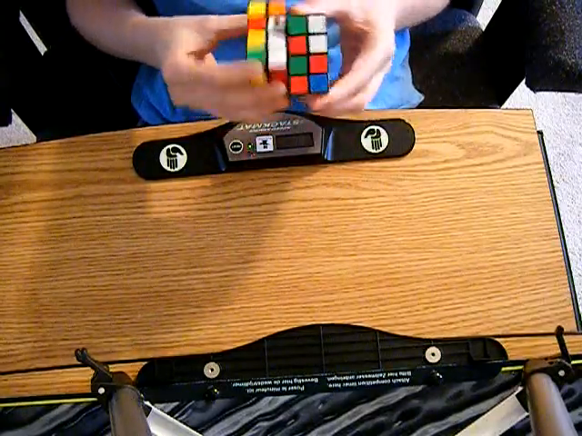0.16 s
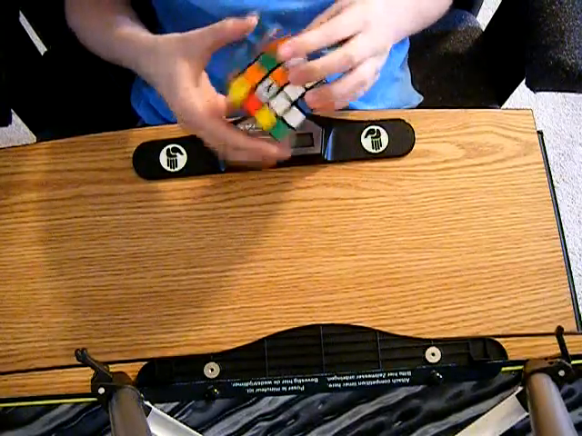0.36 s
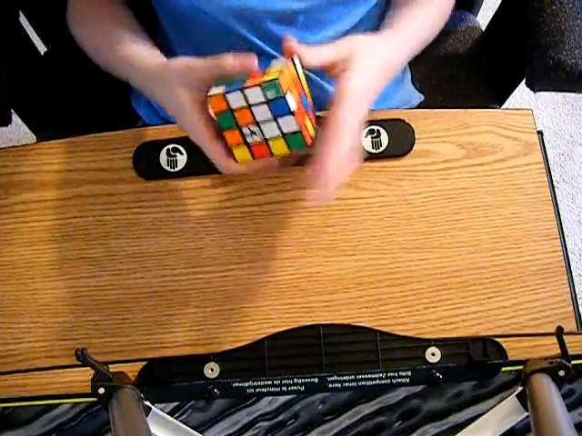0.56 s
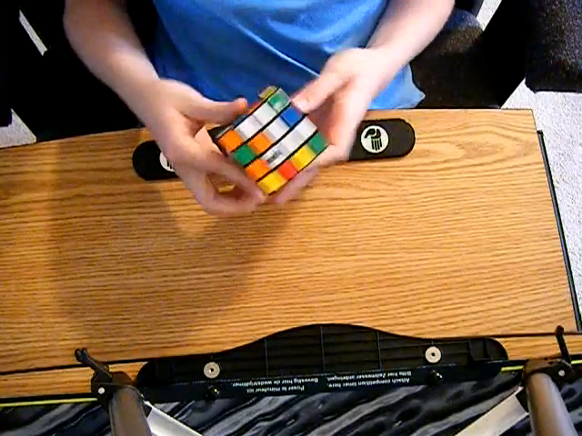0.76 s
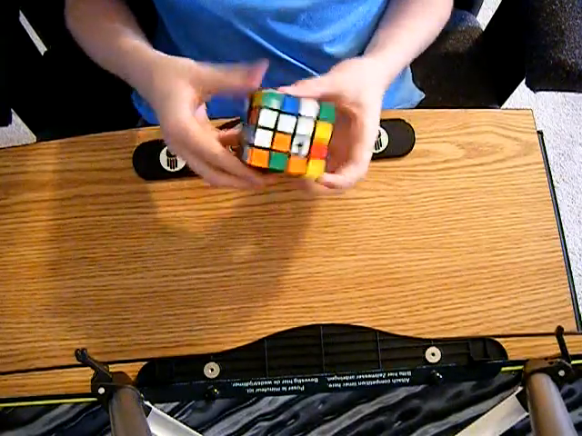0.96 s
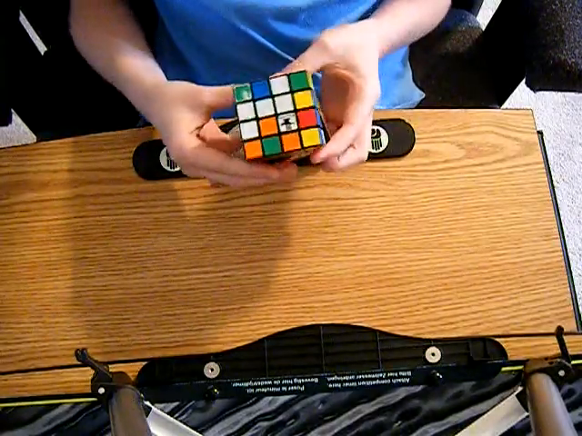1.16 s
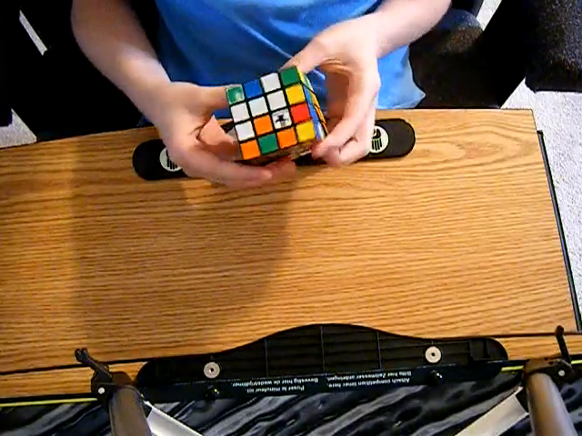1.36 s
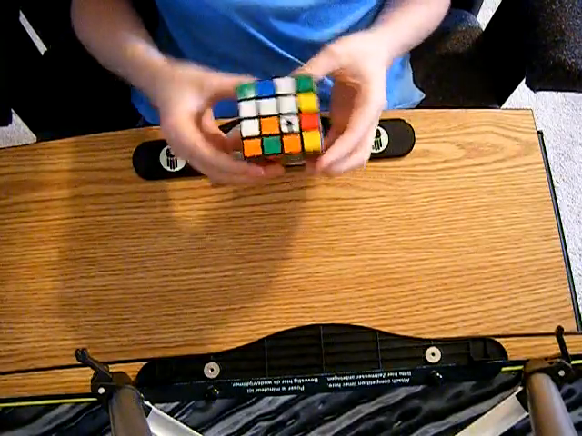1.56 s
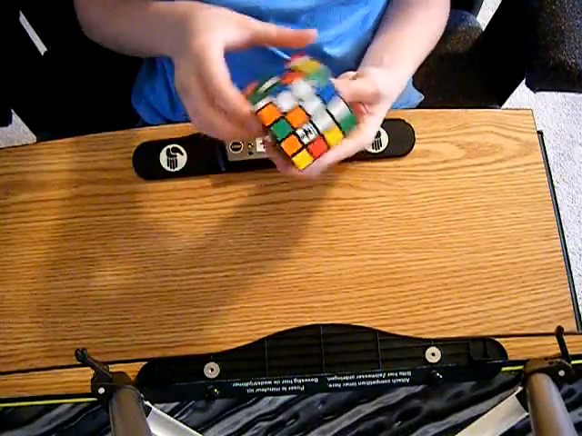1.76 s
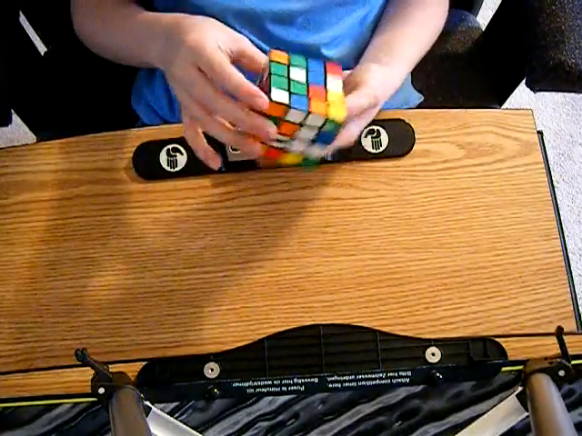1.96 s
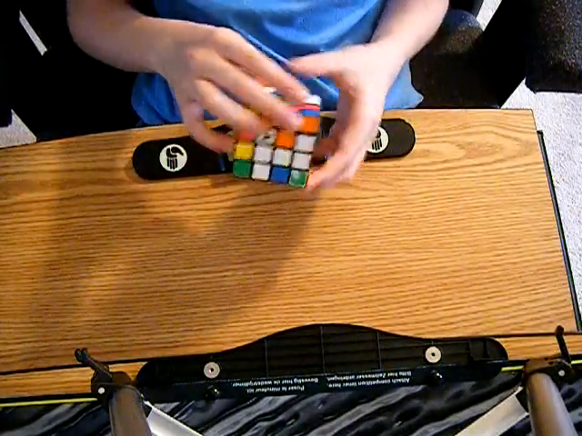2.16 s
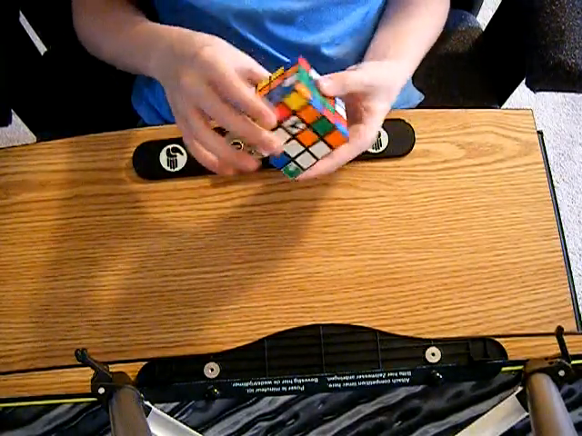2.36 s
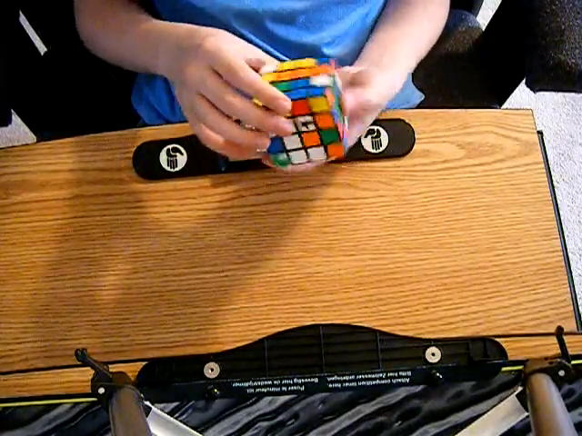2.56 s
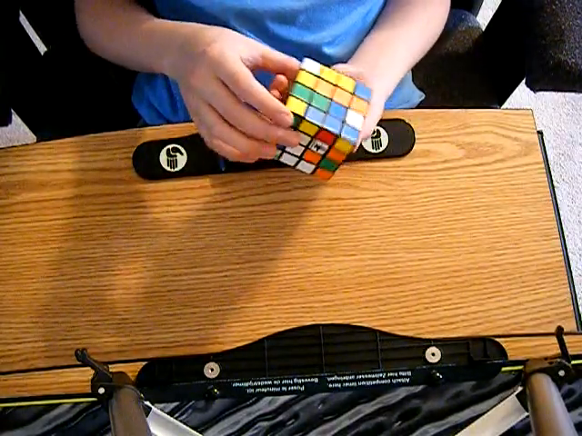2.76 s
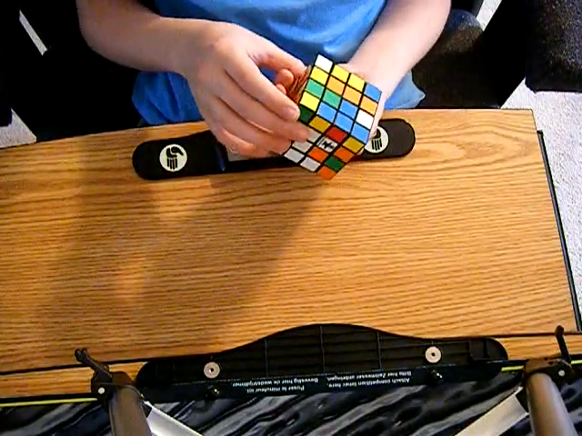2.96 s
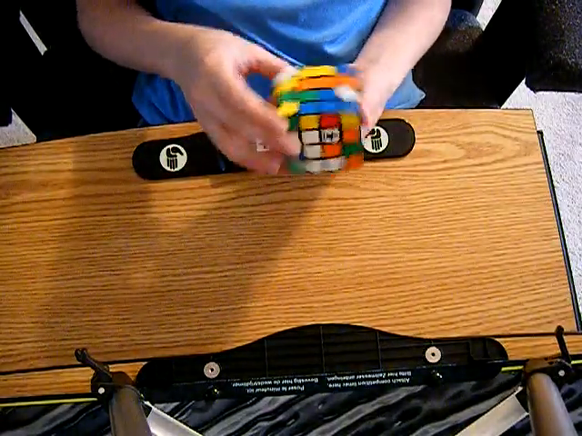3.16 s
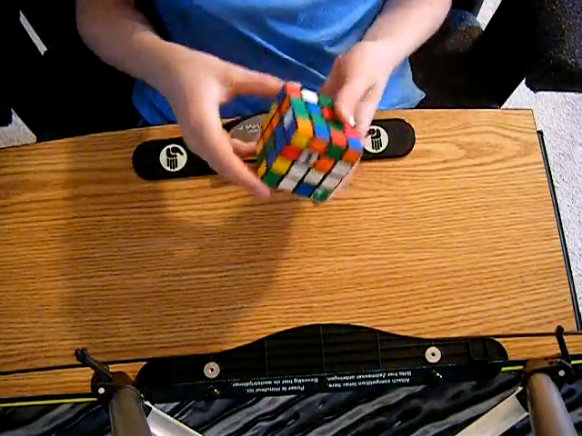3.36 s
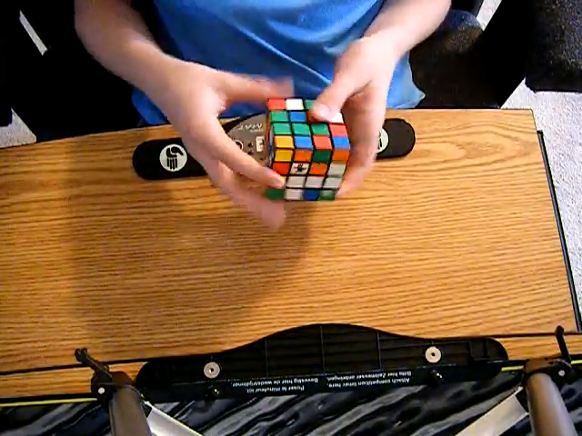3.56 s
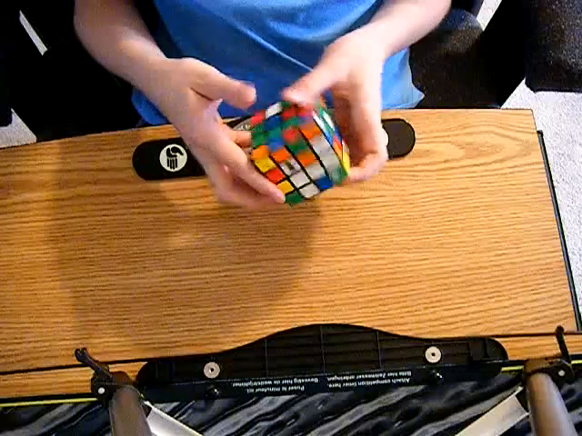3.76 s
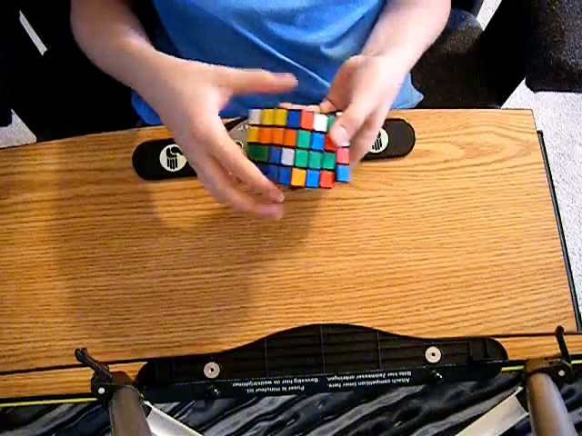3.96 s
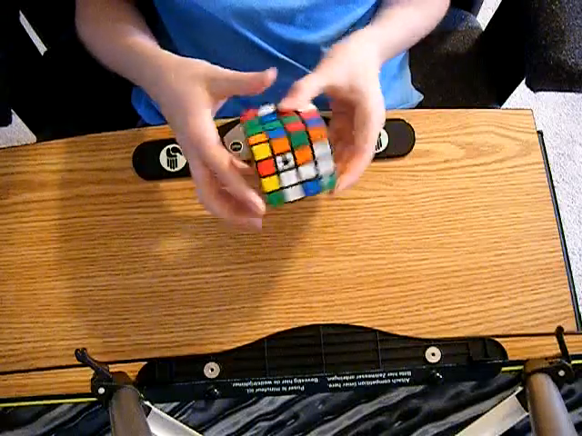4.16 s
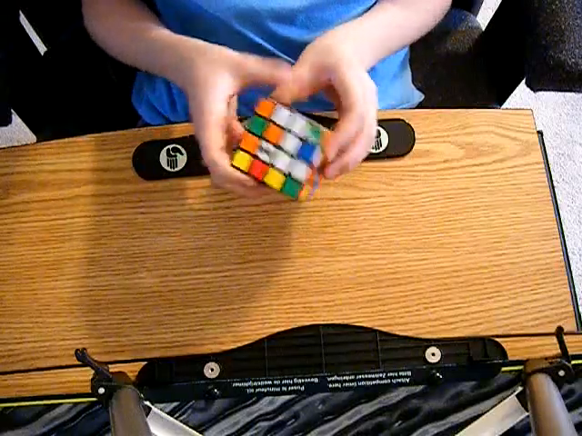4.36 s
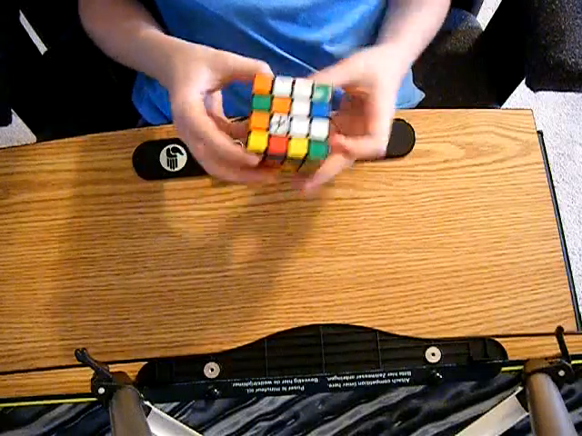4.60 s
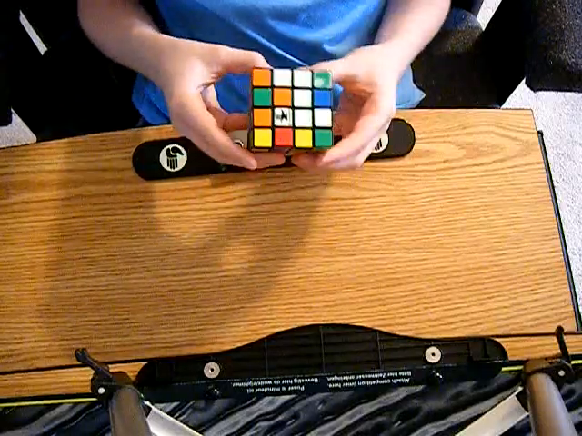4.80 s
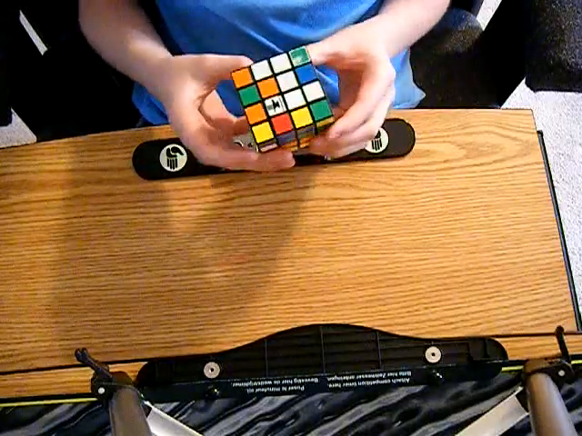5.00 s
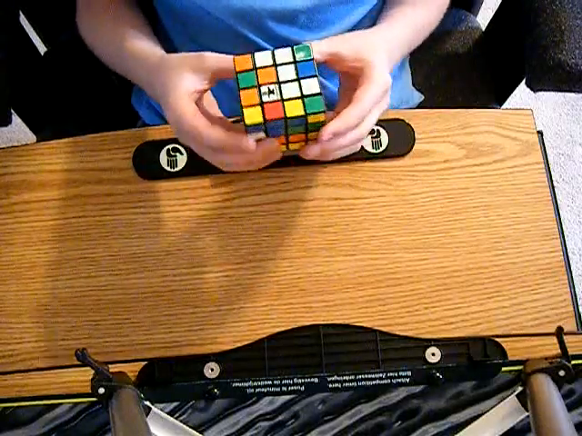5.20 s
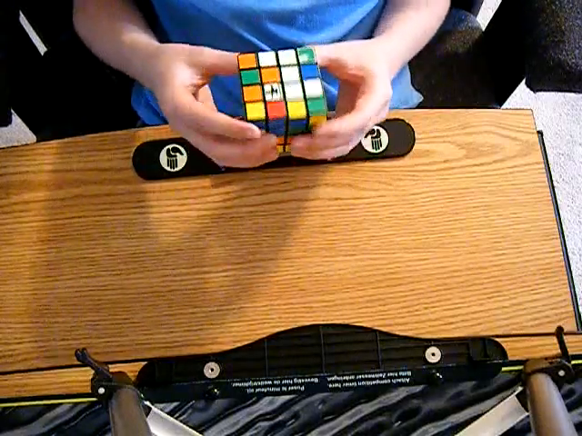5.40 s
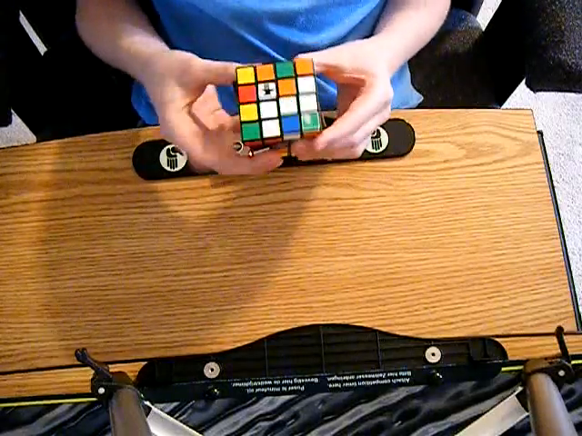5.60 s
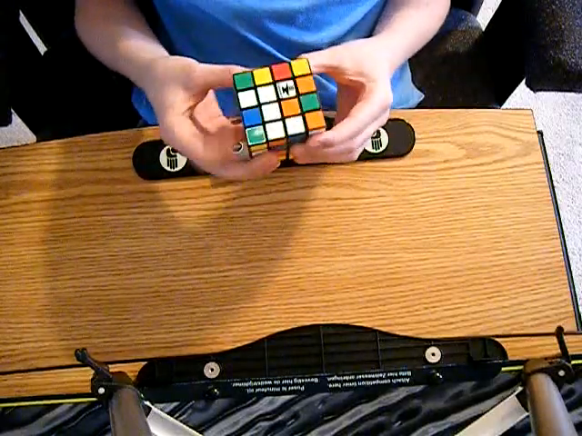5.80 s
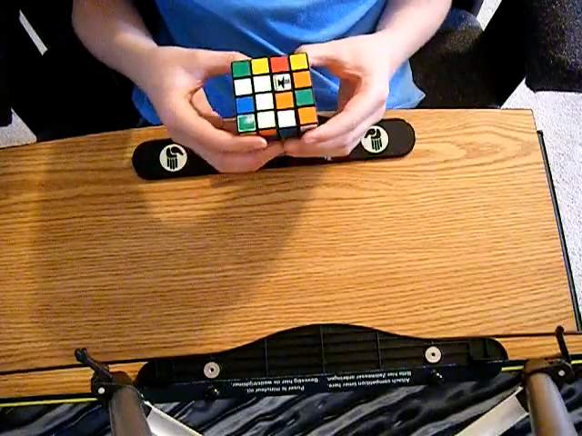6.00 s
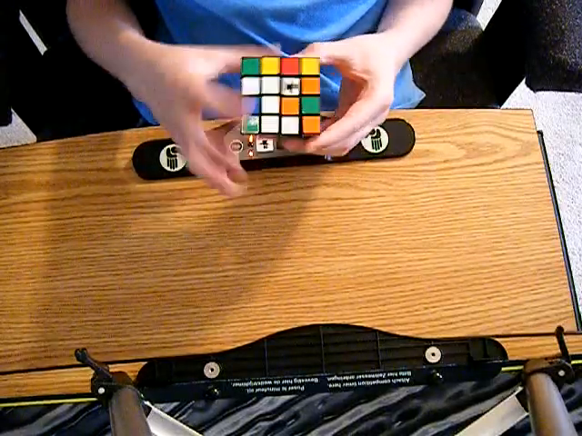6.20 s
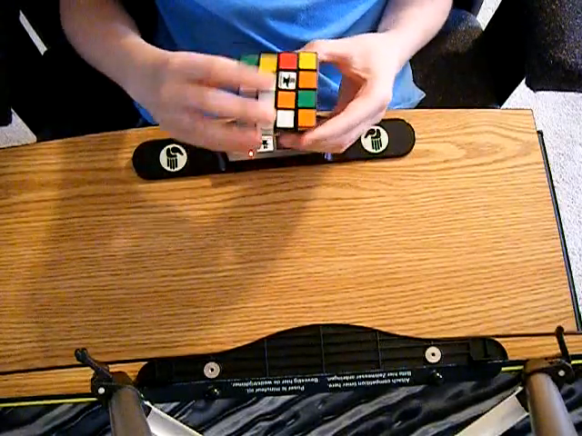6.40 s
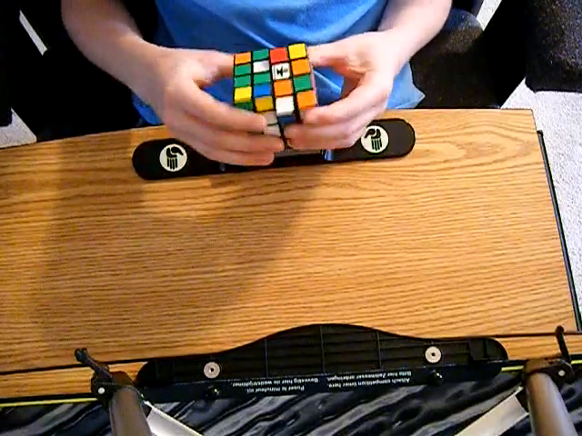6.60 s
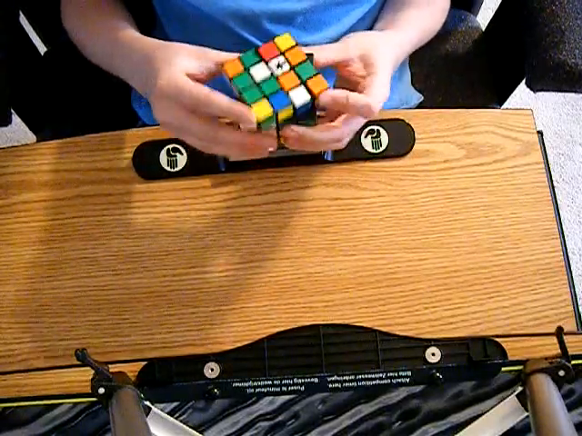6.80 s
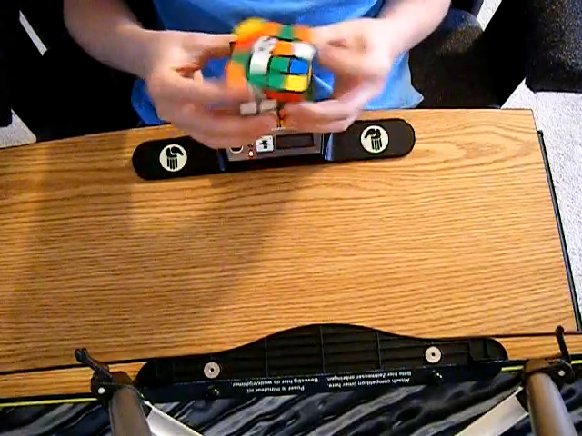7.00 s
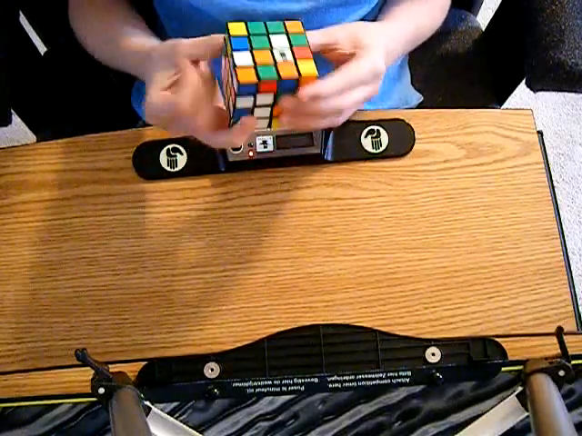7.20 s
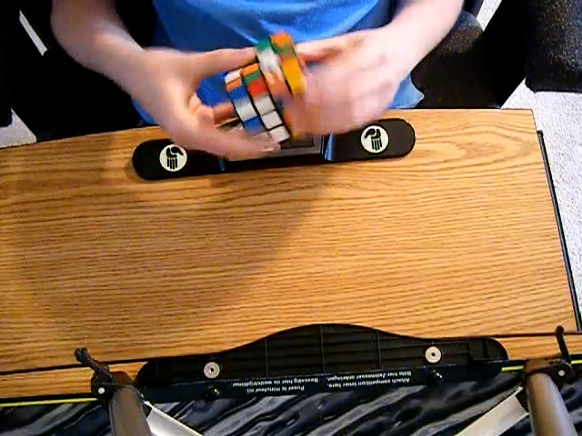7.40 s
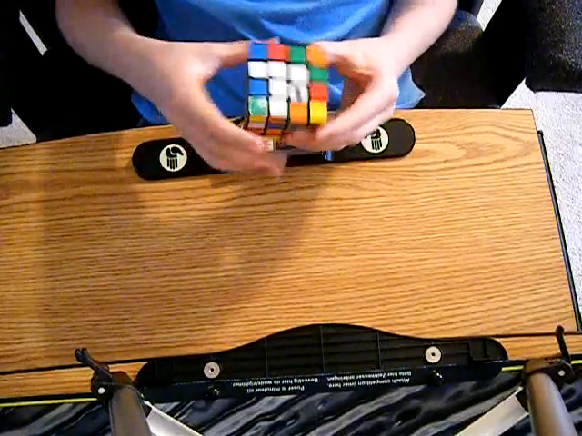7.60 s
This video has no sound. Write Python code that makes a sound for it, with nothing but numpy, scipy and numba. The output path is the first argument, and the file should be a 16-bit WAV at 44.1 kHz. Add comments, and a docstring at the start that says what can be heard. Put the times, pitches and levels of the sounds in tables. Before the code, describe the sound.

Fast plastic clicking and clacking of a hand-turned puzzle cube, loud at first, then softer and sparser, then hard flurries over faint room hiss.

```python
"""Puzzle cube, turned fast

Above a desk in a small room: a plastic cube in the hands, close to a small camera microphone.
Pieces snap past each other in clacks: blows of crack and scuff into hollow core, shells, edges and gap.
Between them the sliding layers rattle and rub, as many small ticks that swell and settle with each turn.
Room echo is a short tail of fresh noise. Behind lie shaped-noise hum and hiss, a thin high whine,
one low gurgle (a roughened, climbing tone) and three brief pings (fading sines).
"""
import sys
import numpy as np
from scipy import signal
from scipy.fft import rfft, irfft, next_fast_len
from scipy.io import wavfile
from numba import njit

SR = 44100
rng = np.random.default_rng(int(sys.argv[2]) if len(sys.argv) > 2 else 0)


def waveform_to_disk(signal):
    """Save audio, clipped to [-1, 1], as 16-bit WAV at the path in sys.argv[1]."""
    frames = np.transpose(np.atleast_2d(signal))
    scaled = np.clip(frames, -1, 1) * 32767
    samples = np.round(scaled).astype(np.int16)
    wavfile.write(sys.argv[1], SR, samples)


N = 337365
TIME = np.arange(N) / SR  # s


def undb(db):
    """Decibels to an amplitude factor."""
    return 10 ** (np.asarray(db) / 20)


def unit(x):
    """Scale to an RMS of 1."""
    return x / np.sqrt(np.mean(x ** 2))


def curve(s, values):
    """Straight lines through values at times s, one value per sample."""
    return np.interp(TIME, s, values)


# Spectrum of room hum and microphone hiss: f/Hz, relative level per Hz/dB
HUM = [(25, -6), (50, 1), (130, 2), (350, -3), (800, -6), (2000, -12.5), (5000, -18.5), (10000, -22),
       (16000, -17)]
HUM_DB = -52.5  # RMS before the treble filters
WHINE_HZ, WHINE_DB = 15734.3, -69  # RMS before the treble filters


def background():
    """Steady room hum and microphone hiss as shaped noise, with the whine of nearby electronics as a sine."""
    hz, db = np.transpose(HUM)
    size = next_fast_len(N)
    f = np.arange(size // 2 + 1) * SR / size + 1  # 1 Hz up, to keep the logarithm finite
    shape = undb(np.interp(np.log(f), np.log(hz), db))
    hum = irfft(rfft(rng.standard_normal(size)) * shape, size)[:N]
    whine = np.sqrt(2) * np.sin(2 * np.pi * WHINE_HZ * TIME)
    return undb(HUM_DB) * unit(hum) + undb(WHINE_DB) * whine


# Course of the low gurgle: t/s, f/Hz, level before roughening/dB
GURGLE = [(2.31, 99.8, -62), (2.33, 101, -42), (2.361, 166.5, -48), (2.402, 206, -49), (2.43, 281, -44),
          (2.49, 278, -52)]


def gurgle(width_hz=95):
    """A brief low rub: a tone that climbs unevenly, its amplitude roughened by low-passed noise."""
    s, hz, db = np.transpose(GURGLE)
    rough = unit(signal.lfilter(*signal.butter(2, width_hz, fs=SR), rng.standard_normal(N)))
    tone = np.sin(2 * np.pi * np.cumsum(curve(s, hz)) / SR)
    sounding = (TIME > s[0]) & (TIME < s[-1])
    return undb(curve(s, db)) * sounding * (0.32 + rough) * tone


# Brief narrow pings of a single piece: t/s, f/Hz, level of the decay at its start/dB
PINGS = [(3.4848, 2370, -28.5), (3.529, 13200, -26), (4.942, 13000, -30)]
PING_MS = 0.97  # time to fall to 1/e


def pings():
    """A single piece rings very briefly on one pitch: a sine with exponential decay."""
    out = 0
    for s, hz, db in PINGS:
        age = np.clip(TIME - s, 0, 1)
        decay = undb(db) * np.exp(-1000 * age / PING_MS) * (age < 1)
        out = out + decay * np.sin(2 * np.pi * hz * age)
    return out


def strikes(s, db):
    """Impulses of the given sizes at the given times."""
    return np.bincount(np.clip((s * SR).astype(int), 0, N - 1), undb(db), N)


def contact(train, fall_ms, echo, build=0.43, crack_db=10, scuff_db=-1):
    """A sharp crack inside a scuff that builds up and fades; echoes are fresh noise, as the cube keeps moving."""
    t60_s, echo_db = echo
    early = SR // 100  # samples of scuff ahead of the crack
    ms = (np.arange(SR // 6) - early) * 1000 / SR
    scuff = undb(scuff_db) * np.exp(np.where(ms < 0, ms / (build * fall_ms), -ms / fall_ms))
    tail = undb(echo_db) * np.exp(-np.log(1000) * ms / 1000 / t60_s)
    tail = tail * np.clip(ms / fall_ms, 0, 1)  # the echo fades in after the crack
    power = signal.oaconvolve(train ** 2, scuff ** 2 + tail ** 2)[early:N + early]
    return undb(crack_db) * train + np.sqrt(np.abs(power)) * rng.standard_normal(N)


def ring(s, db, modes, fall_ms, echo):
    """Blows at times s into steep-sided resonances; db holds the strength of every blow, one row per mode."""
    out = 0
    for row, (hz, width, mode_db) in zip(db, modes):
        peak = signal.iirpeak(hz, hz / width, fs=SR)
        blows = contact(strikes(s, row), fall_ms, echo)
        once = signal.lfilter(*peak, blows)
        out = out + undb(mode_db) * signal.lfilter(*peak, once)
    return out


@njit
def sweep(x, hz, width_hz):
    """Band-pass whose centre may move with every sample, gain 1 at the centre."""
    y, band, low = np.empty(len(x)), 0., 0.
    for i in range(len(x)):
        g, k = np.tan(np.pi * hz[i] / SR), width_hz / hz[i]
        v = (band + g * (x[i] - low)) / (1 + g * (g + k))
        band, low, y[i] = 2 * v - band, low + 2 * g * v, k * v
    return y


def gap(s, db, gap_db=1, width_hz=540.0, fall_ms=0.74):
    """The hollow between turning layers rings; its pitch glides from clack to clack as the gap changes."""
    clack_s, _, clack_hz, _, _ = np.transpose(CLACKS)
    hz = curve(clack_s, clack_hz)
    blows = contact(strikes(s, db), fall_ms, ROOM[1])
    once = sweep(blows, hz, width_hz)
    return undb(gap_db) * sweep(once, hz, width_hz)


# Resonances of the hollow core, the piece shells and their sharp edges, each:
# f/Hz, width of one filter pass/Hz, relative level/dB
CORE = [(980, 192, 3), (1266, 270, -2), (603, 590, -10.5)]
SHELL = [(1770, 1240, 0), (2447, 1620, 1), (3465, 1600, 1), (4620, 3140, -3.5), (6000, 1660, -2.5)]
EDGE = [(10750, 6050, -1.5), (13000, 9900, -13), (17100, 16000, -4)]
# Small-room echo, one row each for core, shell (and gap), edge: time to fall 60 dB/s, relative level/dB
ROOM = [(0.14, -13), (0.095, -11.5), (0.16, -16.5)]


def cube(s, db, hz, favour_db=6, spread_oct=0.27, uneven_db=2.0, brief=1):
    """Core, shell and edge sound of blows: one db row per part, shell modes near hz struck best.

    brief scales the contact time of core, shell and edge."""
    octaves = np.log2(np.array(SHELL)[:, :1] / hz)
    favour = -favour_db * (1 - np.exp(-(octaves / spread_oct) ** 2))
    # each blow lands elsewhere
    uneven = uneven_db * rng.standard_normal((len(s), len(CORE) + len(EDGE))).T
    core = ring(s, db[0] + uneven[:len(CORE)], CORE, 2.27 * brief, ROOM[0])
    shell = ring(s, db[1] + favour, SHELL, 2.81 * brief, ROOM[1]) + gap(s, db[1])
    edge = ring(s, db[2] + uneven[len(CORE):], EDGE, 2.23 * brief, ROOM[2])
    return core, shell, edge


# Turns of a layer: t of fastest sliding/s, build-up/s, rattle level/dB
TURNS = [(0.001, 0.13, -30.5), (0.089, 0.076, -39), (0.179, 0.091, -35), (0.246, .012, -30.5),
         (0.289, 0.076, -25.5), (0.408, 0.084, -39), (0.52, 0.14, -37), (0.64, 0.061, -38),
         (0.77, 0.11, -56), (0.85, 0.022, -49), (0.95, 0.07, -45.5), (1.014, 0.15, -40), (1.1, 0.073, -51),
         (1.34, 0.089, -52), (1.4, 0.024, -52), (1.7, 0.038, -53), (1.859, 0.092, -42.5),
         (1.96, 0.0071, -44.5), (2.06, 0.21, -47), (2.23, 0.029, -44), (2.308, 0.063, -40),
         (2.433, 0.032, -45), (2.52, 0.023, -54.5), (2.689, 0.25, -48.5), (3.25, 0.1, -44),
         (3.41, 0.094, -50.5), (3.55, 0.32, -52.5), (3.77, 0.11, -52), (3.97, 0.39, -54),
         (4.051, 0.0072, -40.5), (4.21, 0.26, -50), (4.392, .025, -46), (4.457, 0.015, -37.5),
         (4.65, 0.24, -46), (4.8, 0.36, -54), (4.93, 0.048, -50.5), (5.1, 0.032, -53.5),
         (5.402, 0.094, -40), (5.545, 0.029, -26), (5.66, 0.14, -39), (5.787, 0.087, -29.5),
         (5.89, 0.071, -54.5), (6.44, 0.012, -50), (6.508, 0.13, -30), (6.68, 0.077, -44),
         (6.816, 0.016, -30.5), (6.932, 0.019, -26.5), (7.05, 0.018, -28), (7.094, 0.02, -23),
         (7.226, 0.087, -29), (7.41, 0.036, -41), (7.457, 0.03, -25.5), (7.526, 0.32, -32.5)]
BUILD_DB = 25.5  # rise over the build-up
HARD_DB, GENTLE_DB = -37, -52  # levels of a hard and a gentle turn
HARD_SETTLE, GENTLE_SETTLE = 273, 97  # fall after each, dB per s
HELD_DB = -64.5  # rattle of the cube merely held


def sliding():
    """Each turn builds up to its fastest slide, then the pieces settle, hard turns more abruptly."""
    power = undb(2 * HELD_DB)
    for s, build_s, db in TURNS:
        settle = np.interp(db, [GENTLE_DB, HARD_DB], [GENTLE_SETTLE, HARD_SETTLE])
        below_db = np.where(TIME < s, BUILD_DB * (s - TIME) / build_s, settle * (TIME - s))
        power = power + undb(2 * (db - below_db))
    return np.sqrt(power)


def rattle(per_s=480, scatter_db=3, most_db=8, colour_db=7, stray_oct=0.43, core_db=-6, edge_db=-2,
           alike=0.53):
    """Many small ticks of loose pieces follow the sliding of the layers, coloured like the clacks nearby."""
    clack_s, _, clack_hz, _, clack_edge = np.transpose(CLACKS)
    chance = rng.random((N // 20, 6))[:int(per_s * N / SR)].T  # one column per tick
    when = chance[0] * N / SR
    size_db = np.minimum(-scatter_db * np.log(1 - chance[1]), most_db)
    part_db = size_db + colour_db * chance[2:5]  # core, shell and edge vary separately
    hz = np.interp(when, clack_s, clack_hz) * 2 ** (stray_oct * (chance[5] - .5))
    core, shell, edge = (unit(part) for part in cube(when, part_db, hz, brief=0.77))
    # edges share part of the sharpness of the clacks
    edge = edge * undb(edge_db + alike * curve(clack_s, clack_edge))
    return sliding() * (undb(core_db) * core + shell + edge)


# Clacks: t/s, relative strength level/dB, strongest shell ring f/Hz,
# extra level for the hollow core/dB, extra level for the sharp edge/dB
CLACKS = [(0.0151, -41, 3300, -11, 1), (0.103, -29, 3200, -5, -16), (0.1577, -26, 2510, -3, -5),
          (0.1709, -28, 3500, 5, -15), (0.1922, -24, 3760, 2.5, -7), (0.24, -25, 3850, -13, -14),
          (0.2456, -24, 3600, 5, -15), (0.265, -10.5, 2700, -3, -5), (0.2825, -13, 3300, -3, -13),
          (0.2935, -6.5, 3920, -17, -4.5), (0.4045, -30, 2640, -7, -5), (0.4134, -28, 2960, -7, -14),
          (0.4924, -26, 3950, -1, 3.5), (0.5215, -28, 2320, -2, 2), (0.5572, -29, 3900, 0, -7),
          (0.599, -27, 3130, -3.5, -1), (0.6258, -31, 5500, -4, 0), (0.648, -26, 3350, -6, -4),
          (0.735, -31, 2970, -7, -11), (0.7446, -34.5, 2250, -9, -12), (0.7645, -39, 3300, -12, -13),
          (0.837, -33, 3300, 1, -8), (0.85, -41, 3500, 1, 1), (0.8583, -29.5, 2160, 1, -5),
          (0.8704, -38, 2780, -14, 1), (0.974, -22, 2660, -3, -16), (0.982, -24.5, 2640, -5, -4),
          (0.9993, -20.5, 3240, -18, -7), (1.0695, -31, 3180, -8, -5), (1.123, -33.5, 3660, -5, -11),
          (1.1985, -36.5, 3260, -5, -10), (1.3257, -36, 3300, 0, -8), (1.402, -33, 3320, -3, -7.5),
          (1.6649, -36.5, 2350, -1.5, -8), (1.692, -30.5, 2310, -2.5, 1), (1.7748, -34.5, 2340, 4, -5),
          (1.865, -31.5, 3300, 3, -6), (1.9597, -28, 3570, -1.5, -5), (1.983, -29, 3400, -1, -6),
          (1.9989, -28, 3300, -2.5, 0.5), (2.046, -29.5, 1700, -3, -2), (2.0549, -33, 2260, 3, 3.5),
          (2.0672, -31.5, 4270, -5, 5.5), (2.155, -36.5, 3020, 1.5, -10), (2.2305, -27.5, 3320, -6.5, -3),
          (2.2832, -30, 3700, -7, -5), (2.316, -29.5, 2340, -4, -5), (2.5168, -25, 2860, -4, -7.5),
          (2.6382, -28.5, 2660, 4, -11), (2.6678, -27.5, 3020, -8, 0), (2.6775, -30, 1950, -8, -4),
          (2.7005, -28.5, 1710, -15, -9), (2.809, -36.5, 2200, 1.5, -3), (3.192, -37.5, 3000, -8, -6),
          (3.2157, -31, 2140, -22, -13), (3.2444, -32.5, 2960, -10, -10), (3.257, -34.5, 3230, 0, 9),
          (3.292, -32.5, 2080, -6, -11), (3.4117, -33, 2910, -5, -12), (3.4411, -29.5, 1880, -2.5, -3.5),
          (3.485, -35, 2400, -2, -8), (3.516, -37, 3700, -10, -13), (3.5291, -37, 2500, -15, -3),
          (3.55, -37, 2150, -4, 0), (3.5852, -31.5, 2420, -2, -1), (3.6217, -32, 4430, -10, -10),
          (3.7727, -32.5, 2640, 1.5, -9), (3.845, -38, 2310, -3, -12), (3.8642, -39, 2180, -1, -11),
          (3.9357, -35, 3180, -0.5, -13), (3.9623, -31, 2270, -4.5, -11), (4.0184, -33.5, 3050, -1, -18),
          (4.046, -20, 2800, -11, -8), (4.056, -23.5, 3000, -7, -10), (4.1142, -39, 2360, -27, -11),
          (4.15, -34, 2630, -12, -4), (4.2631, -28.5, 1550, -21, -1.5), (4.391, -32.5, 4100, -22, -14),
          (4.4125, -32.5, 1860, -2, -13), (4.4612, -15, 3300, -9, -2), (4.505, -26.5, 2070, -19, -4),
          (4.638, -30, 2070, -10, -6), (4.6602, -26, 3520, -10, -6.5), (4.685, -27, 2090, -6, -13),
          (4.76, -34.5, 2200, -13, -16), (4.8354, -34.5, 5100, -4, -4), (4.8448, -33.5, 2360, -6, -6),
          (4.9222, -32.5, 2080, -19, -8), (4.942, -36, 3720, 3, 1), (4.999, -32.5, 2020, -4, -13),
          (5.0875, -29.5, 4240, -12, 2.5), (5.188, -37, 2250, -15, -7), (5.3152, -32, 3380, 1, -1.5),
          (5.3923, -24, 3440, -14, -4), (5.4072, -21, 3520, -18, -2), (5.4486, -21.5, 2130, -12, -1.5),
          (5.528, -23, 2740, -5, -13), (5.536, -16, 2500, -5, 5), (5.5515, -8, 4160, -3, -1.5),
          (5.561, -18.5, 2520, 1, 9), (5.5817, -14, 2470, -1.5, 4), (5.65, -30, 3320, -2, 1),
          (5.7197, -26.5, 3080, 0, -10), (5.7294, -35, 2580, -23, -26), (5.757, -19.5, 2620, -9, -3),
          (5.7724, -16.5, 2800, -13, 4), (5.782, -11, 2840, -12, -1), (5.7933, -17.5, 2550, -6, 6),
          (5.8017, -24.5, 2600, -10, 8), (5.8632, -23.5, 5670, -6, 0), (5.879, -26.5, 3280, 0, 5),
          (5.9738, -32, 2850, -1.5, -3), (6.0253, -32.5, 4900, -5.5, -11), (6.1677, -40.5, 2340, 4.5, -10),
          (6.4305, -14.5, 3250, -6, -6), (6.4825, -21, 3250, -10, -9), (6.4983, -20.5, 3600, -14, -11),
          (6.5067, -19, 3600, -10, -8), (6.516, -17.5, 3800, -10, -11), (6.6318, -24, 3700, -16, -4),
          (6.6832, -25, 3570, -26, -12), (6.7114, -28.5, 1900, -4, -6), (6.781, -36, 2600, -7, -14),
          (6.809, -18.5, 2830, 3, -5), (6.822, -17.5, 2950, -7, -3), (6.8424, -21, 2830, -27, -7.5),
          (6.911, -19.5, 2970, -4, -11), (6.9265, -19, 2600, -7, -3), (6.939, -18.5, 3220, 1, 3.5),
          (6.974, -16, 2500, 0.5, -6), (7.0531, -15.5, 2660, -5, 6.5), (7.096, -15, 3630, -28, 6.5),
          (7.1047, -15.5, 4200, -13, -15), (7.129, -29.5, 2530, 2, 8), (7.184, -21, 1580, 3, -5),
          (7.195, -23, 1700, -5, -1), (7.2077, -16.5, 2020, -8, -11), (7.2192, -10.5, 2210, 0, 2.5),
          (7.2555, -22.5, 3230, -25, 3), (7.3276, -41, 2150, -2, -12), (7.3422, -34.5, 2410, -7, -1),
          (7.3728, -22.5, 2850, -8, 12), (7.405, -19.5, 3100, -4.5, 3), (7.415, -21, 3300, -13, -18),
          (7.448, -13.5, 2800, -3.5, 1.5), (7.472, -17, 3840, -22, -8), (7.483, -22, 3650, -25, -4),
          (7.4945, -11.5, 4030, -27, -6), (7.5283, -18, 2980, -11, -8), (7.5757, -31, 3440, -6, -13),
          (7.59, -31, 1900, -30, 0), (7.6, -28.5, 2110, -6, -4.5)]


def clacks(core_db=12, shell_db=5, edge_db=2):
    """One blow excites the hollow core, the shells of the pieces and their sharp edges."""
    s, db, hz, core, edge = np.transpose(CLACKS)
    part_db = (db + core + core_db, db + shell_db, db + edge + edge_db)
    return sum(cube(s, part_db, hz))


def scene():
    """The cube close up and the room behind it, summed to one channel."""
    return (clacks() + rattle() + pings() + gurgle() + background())[None]


DIP_HZ, DIP_WIDTH_HZ, SECOND_WIDTH_HZ = 7800, 1130, 900  # two notches on one centre
TOP_HZ = 15850  # upper limit


def record(dry):
    """The treble is thinned around 7.8 kHz and ends steeply near 15.85 kHz: two notches, then a low-pass."""
    first = signal.iirnotch(DIP_HZ, DIP_HZ / DIP_WIDTH_HZ, fs=SR)
    second = signal.iirnotch(DIP_HZ, DIP_HZ / SECOND_WIDTH_HZ, fs=SR)
    # a little of the input leaks past each notch
    x = signal.lfilter(*first, dry) + undb(-66) * dry
    x = signal.lfilter(*second, x) + undb(-25.5) * x
    top = signal.ellip(12, .3, 70, TOP_HZ, fs=SR, output="sos")
    return signal.sosfilt(top, x)


dry = scene()
out = record(dry)
waveform_to_disk(out)
```